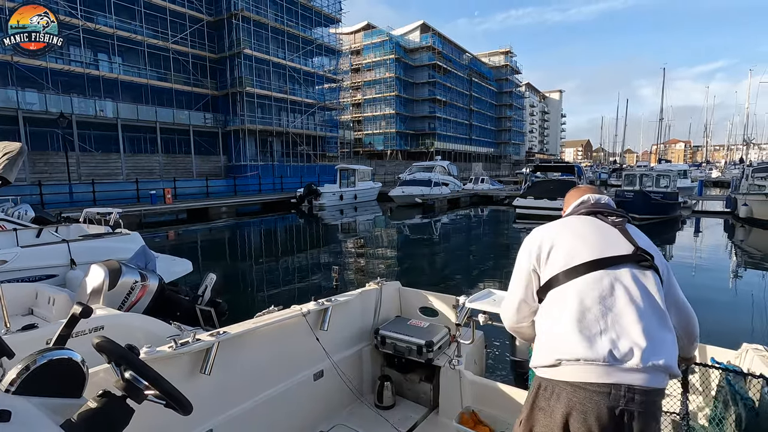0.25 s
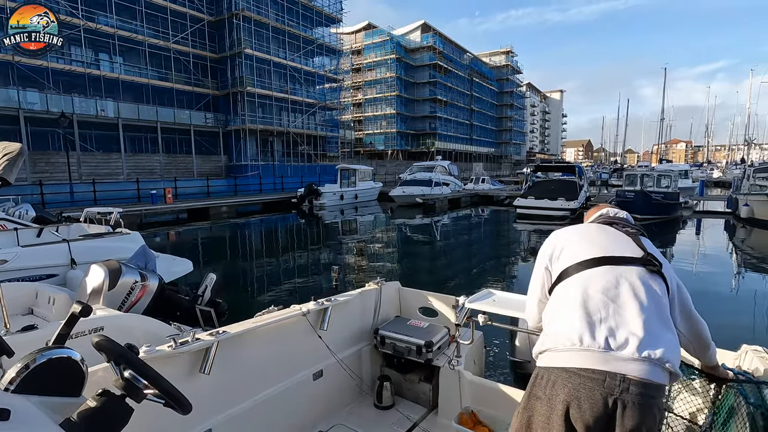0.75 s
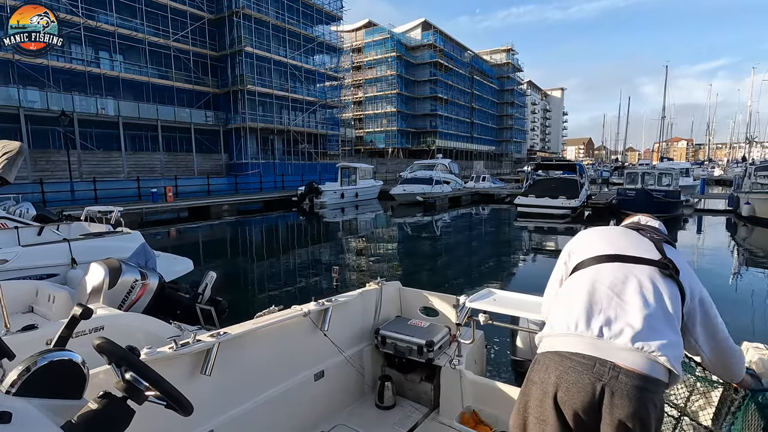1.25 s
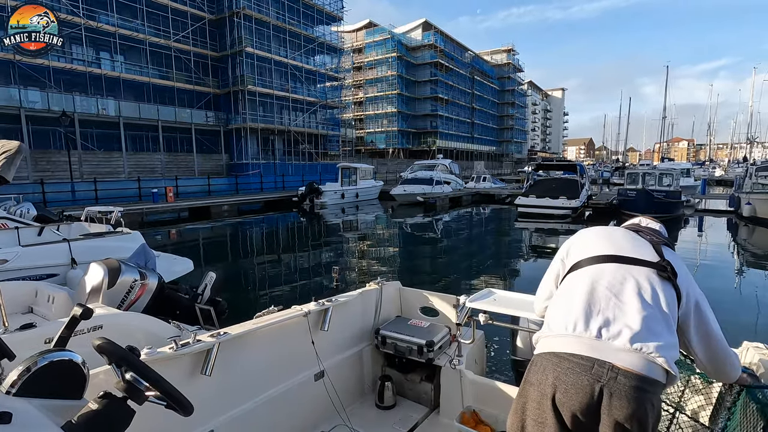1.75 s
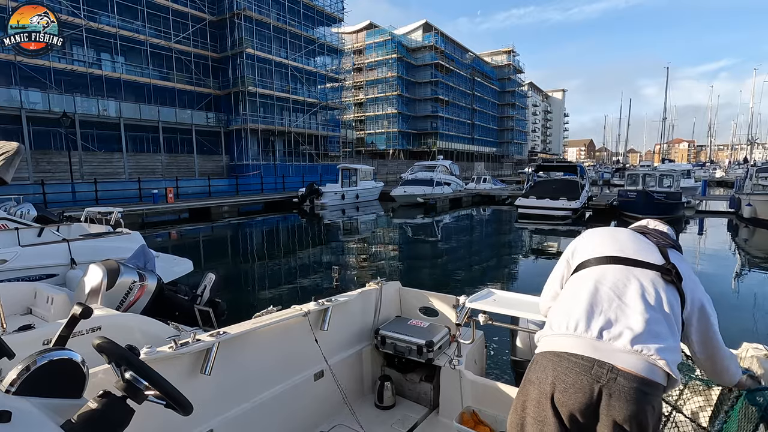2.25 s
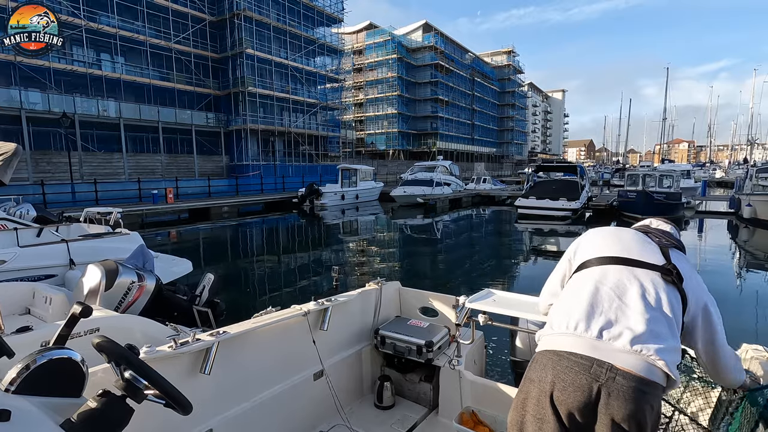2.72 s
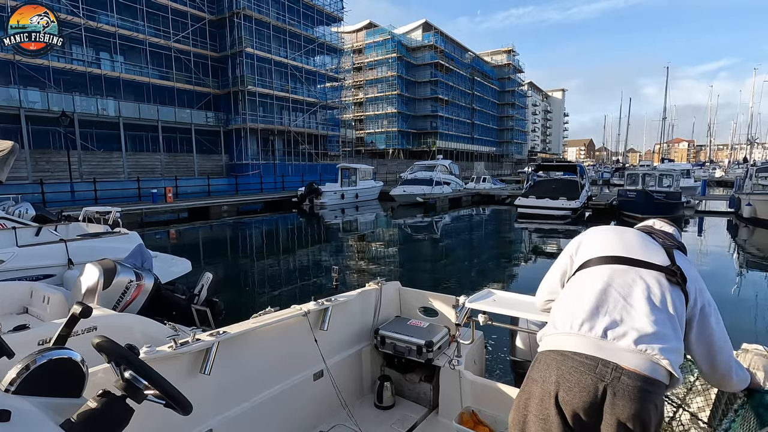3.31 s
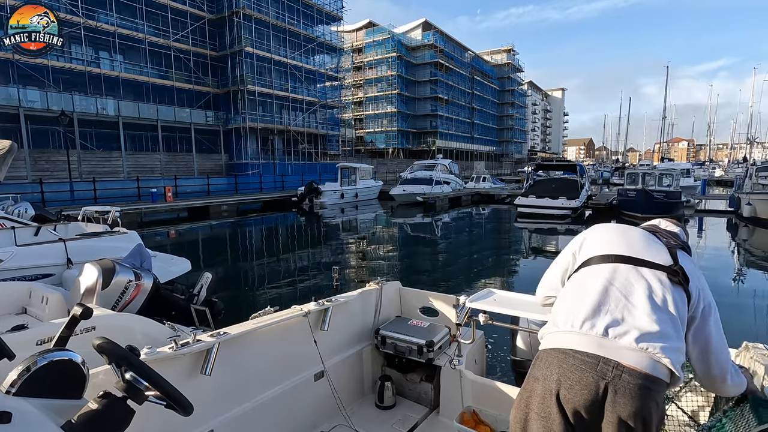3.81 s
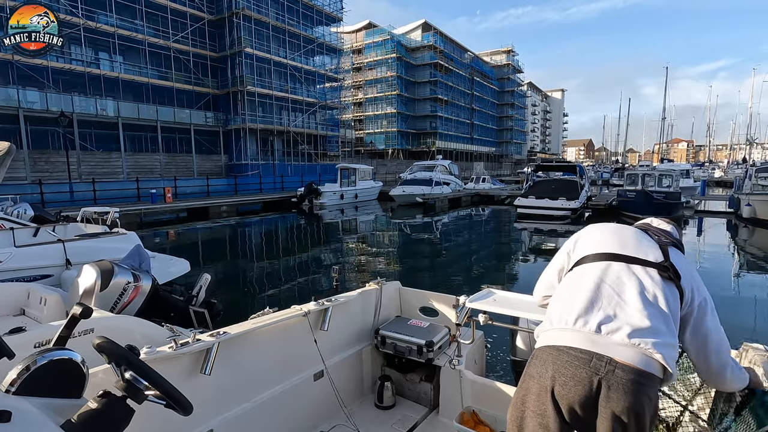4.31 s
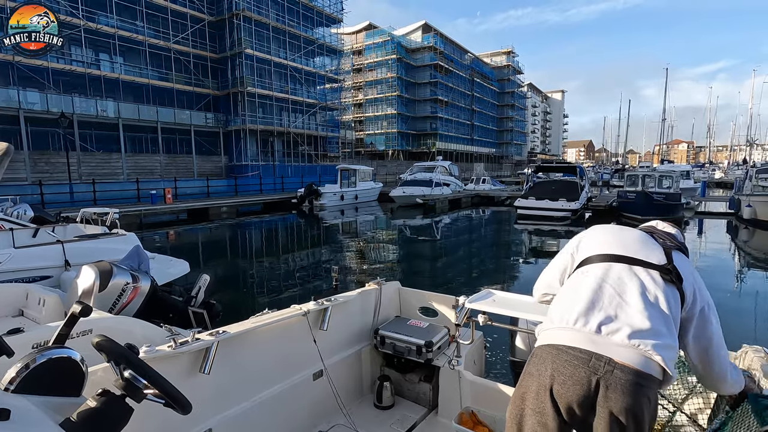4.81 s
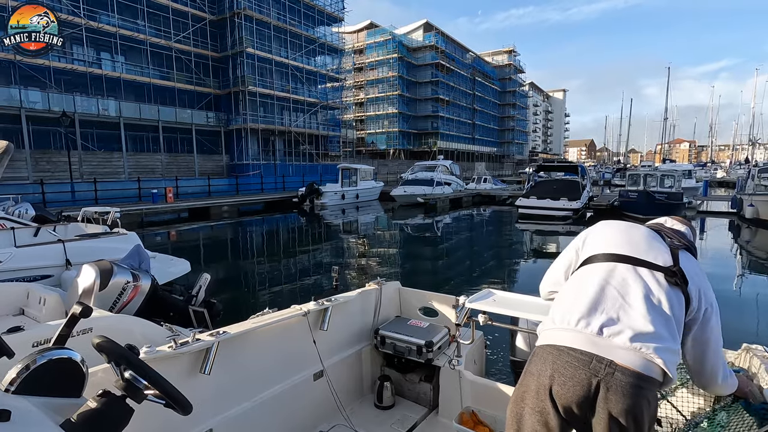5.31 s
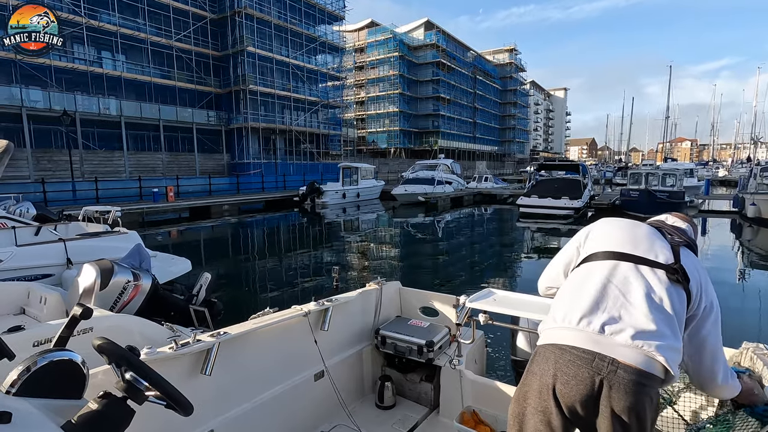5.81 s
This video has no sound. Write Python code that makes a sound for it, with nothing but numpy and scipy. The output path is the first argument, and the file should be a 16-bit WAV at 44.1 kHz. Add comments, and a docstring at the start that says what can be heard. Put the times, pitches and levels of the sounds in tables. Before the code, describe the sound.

Hollow thumps and scratchy net scuffs give way to busy wire rattling and knocking on a boat hull, close up, over a faint harbour wash.

```python
"""Hollow thuds of a small open boat come first, over the rumble and hiss of a netted wire crab trap
dragged about and knocked against its side. Blows bounce on ringing hull modes, clacks chatter through
wire modes, and scuffs and sliding net are filtered grit and noise. A dense reverb and a quiet
wash of water and town lie behind. The microphone is close; the hardest blows drive its limiter."""
import sys
import numpy as np
from scipy import signal
from scipy.fft import rfft, irfft, next_fast_len
from scipy.io import wavfile
from scipy.ndimage import uniform_filter1d, minimum_filter1d

SR = 44100
rng = np.random.default_rng(int(sys.argv[2]) if len(sys.argv) > 2 else 0)


def wav_out(sig):
    """Save sig, one row per channel (or a flat mono array), as 16-bit PCM at SR to the path in sys.argv[1]."""
    wavfile.write(sys.argv[1], SR, np.round(np.clip(np.atleast_2d(sig).T, -1, 1) * 32767).astype(np.int16))


N = 267043  # length in samples


def gain_of(db):
    """Amplitude factor of a level in dB."""
    return 10 ** (np.asarray(db) / 20)


def evened(x):
    """Scales x to an RMS of 1."""
    return x / np.sqrt(np.mean(x ** 2) + 1e-20)


def peaked(x):
    """Scales x to a peak of 1."""
    return x / (abs(x).max() + 1e-20)


def read(points, hz):
    """Reads a curve of (Hz, value) points along a logarithmic frequency axis."""
    f, value = np.transpose(points)
    return np.interp(np.log(hz + 1), np.log(f + 1), value)


def add(mix, start_s, sound):
    """Lays a sound into the mix in place, cut off at the end of the mix."""
    part = mix[round(start_s * SR):][:len(sound)]
    part += sound[:len(part)]


def coloured(x, points):
    """Filters x by a spectrum in dB."""
    size = next_fast_len(len(x))
    gain = gain_of(read(points, np.fft.rfftfreq(size, 1 / SR)))
    return irfft(rfft(x, size) * gain, size)[:len(x)]


def highpass(x, order, hz):
    """Removes the bass below hz."""
    return signal.sosfilt(signal.butter(order, hz, "high", fs=SR, output="sos"), x)


def uneven(count, s):
    """Smooth random curve of RMS 1 that changes over about s seconds."""
    width = round(s * SR)
    return evened(uniform_filter1d(uniform_filter1d(rng.standard_normal(count), width), width))


def patchy(x, patch_db):
    """Random patches, about 1 kHz by 20 ms, louder or softer than their neighbours."""
    z = signal.stft(x, nperseg=256)[2]
    across_pitch = uniform_filter1d(rng.standard_normal(z.shape), size=6, axis=0)
    patches = evened(uniform_filter1d(across_pitch, size=7, axis=1))
    return signal.istft(z * gain_of(patch_db * patches), nperseg=256)[1][:len(x)]


def taps(count, per_s, spread_db):
    """Random tiny contacts of either sign; a few stray far in size, by up to four times spread_db."""
    chance = rng.random(count)
    size = np.minimum(rng.exponential(1, count), 4)
    sign = rng.choice([-1., 1.], count)
    return (chance < per_s / SR) * sign * gain_of(spread_db * size)


def blow(t, lasts, rise):
    """Force of a blow: it rises, then dies away by 60 dB in lasts."""
    return (1 - np.exp(-t / max(rise, 1e-4))) ** 2 * gain_of(-60 * t / max(lasts, .004))


def bounces(t, per_s, spread_db, lasts, rise, first_db):
    """A firm first contact among random ones that swell and die away."""
    force = taps(len(t), per_s, spread_db) * blow(t, lasts, rise)
    first = np.arange(len(t)) == round(2 * rise * SR)
    return force + gain_of(first_db) * first


def softened(force, contact):
    """A contact that lasts a while (s) pushes smoothly and so excites less treble."""
    return np.convolve(force, np.hanning(3 + round(contact * SR)))[:len(force)]


def ring(modes, t, spot_hz, fall_db, shift):
    """Modes after one tap, shifted at random by the load; they lose fall_db per octave from spot_hz."""
    hz, db, t60 = np.transpose(modes)[:, :, None]
    hz = hz * np.exp(shift * rng.standard_normal(hz.shape))
    db = db - fall_db * abs(np.log2(hz / spot_hz))
    decay = gain_of(db - 60 * t / np.maximum(t60, .005))
    return (decay * np.sin(2 * np.pi * hz * t)).sum(0)


def struck(force, modes, t, spot_hz, fall_db, shift):
    """A body answers each push of the force with its ringing modes."""
    return signal.fftconvolve(force, ring(modes, t, spot_hz, fall_db, shift))[:len(t)]


def rubbed(modes, per_s, spread_db, spot_hz, fall_db, shift):
    """Small slips at many spots, each exciting one mode of the body."""
    modes = modes * 3  # three copies, each shifted by its own chance
    slips, which = taps(N, per_s, spread_db), rng.integers(0, len(modes), N)
    t = np.arange(SR // 8) / SR
    total = np.zeros(N)
    for k, mode in enumerate(modes):
        response = ring([mode], t, spot_hz, fall_db, shift)
        total += signal.oaconvolve(slips * (which == k), response)[:N]
    return evened(total)


# Colour of the far wash. Each row: frequency in Hz, relative filter gain in dB.
HARBOUR_COLOUR = [(24, -33), (40, -69), (277, 20), (568, -7), (728, 15), (1080, -3), (3390, -19),
                  (4030, -25), (15000, -81)]


def harbour():
    """Far, smooth wash of water and town: steady noise through a fixed spectrum."""
    return gain_of(-48) * evened(coloured(rng.standard_normal(N), HARBOUR_COLOUR))


# Reverb of the open boat. Each row: frequency in Hz, time to fall 60 dB in seconds.
COCKPIT_DECAY = [(100, 0.3), (300, 0.14), (1000, 0.11), (5000, 0.17)]


def cockpit(x):
    """Dense reflections in the open boat, each band dying at its own speed."""
    hz, t, z = signal.stft(rng.standard_normal(SR // 2), SR, nperseg=256)
    decay = gain_of(-60 * t / read(COCKPIT_DECAY, hz)[:, None])
    tail = signal.istft(z * decay, SR, nperseg=256)[1]
    return signal.fftconvolve(x, tail / np.linalg.norm(tail))[:N]


# Modes of the hull panel, before load shift and spot weighting.
# Each row: frequency in Hz, level in dB, time to fall 60 dB in seconds (before HELD when sliding).
HULL_MODES = [(138, -21, 0.093), (160, -1.5, 0.067), (172, -19, 0.25), (196.3, -8, 0.13), (243.5, 4, 0.14),
              (285, 3, 0.13), (324.4, 5.5, 0.12), (370.4, 3, 0.15), (398.6, 8, 0.16), (437, -10, 0.35),
              (537, -17, 0.19), (595, 1.5, 0.057), (681, 5, 0.12)]
# Knock of the frame's rim. Each row: frequency in Hz, filter gain in dB.
RIM_COLOUR = [(600, 7.5), (800, 10), (1100, 2), (1500, -5.5), (2200, -9.5), (4000, -60)]
HELD = 0.7  # factor on decay time: the loaded hull rings shorter while sliding


def sliding_hull(jolts):
    """Slips rumble the loaded hull while the rim ticks along it, both in jolts."""
    held_modes = [(hz, db, HELD * t60) for hz, db, t60 in HULL_MODES]
    slips = rubbed(held_modes, per_s=900, spread_db=3, spot_hz=280, fall_db=2.5, shift=0.069)
    hull = evened(softened(slips, contact=0.0005))
    rim = evened(coloured(taps(N, per_s=1200, spread_db=-1.5), RIM_COLOUR))
    boat = evened((hull + gain_of(-5.5) * rim) * gain_of(4.5 * jolts))
    return highpass(boat, 2, 95)


# Modes of the wire mesh, before load shift and spot weighting.
# Each row: frequency in Hz, level in dB, time to fall 60 dB in seconds (before LOOSE when sliding).
MESH_MODES = [(1450, 19, 0.0048), (1800, 1, 0.014), (2150, 7, 0.0026), (2420, 8, 0.015),
              (2640, 13.5, 0.0077), (3080, 10, 0.019), (3480, 4, 0.019), (3750, 8.5, 0.011),
              (4160, -9, 0.08), (5070, -10, 0.013)]
LOOSE = 1.5  # factor on decay time: the loose mesh rings longer while sliding


def sliding_mesh(jerks):
    """Slips set loose wires ringing, in jerks."""
    loose_modes = [(hz, db, LOOSE * t60) for hz, db, t60 in MESH_MODES]
    rattle = rubbed(loose_modes, per_s=1400, spread_db=4, spot_hz=2950, fall_db=8, shift=0.11)
    return evened(rattle * gain_of(4 * jerks))


# Colour of wet netting. Each row: frequency in Hz, filter gain in dB.
HISS_COLOUR = [(710, -2), (1200, -2), (1870, -2.5), (1950, -50), (2320, -0.5), (6440, -1.5), (10100, -13.5),
               (15200, -28), (16000, -40)]


def sliding_netting(jerks, hiss_gain):
    """Wet netting hisses: noise and tiny contacts, filtered and stirred in patches and jerks."""
    halting = 1 - 0.6 * hiss_gain / hiss_gain.max()  # a fast, loud slide runs more evenly
    fizz = 0.69 * evened(taps(N, per_s=2700, spread_db=5.0)) + rng.standard_normal(N)
    hiss = patchy(coloured(fizz, HISS_COLOUR), patch_db=2.5)
    return evened(hiss * gain_of(5.4 * halting * jerks))


# How hard the trap slides, in straight lines between rows.
# Each row: time in seconds, hull rumble in dB, mesh rattle in dB, hiss of wet netting in dB.
DRAG_LEVELS = [(0.0, -17.5, -37.5, -34.5), (0.46, -37.5, -35, -31.5), (0.62, -30.5, -37, -32.5),
               (1.03, -24.5, -47, -43), (1.499, -57, -37, -52), (1.65, -38.5, -50, -69),
               (1.89, -48, -49.5, -52), (2.1, -33, -36.5, -36), (2.145, -35, -41, -41),
               (2.165, -37, -35, -29.5), (2.45, -38, -30, -26.5), (2.72, -23, -30, -31.5),
               (2.805, -44.5, -39, -49.5), (2.86, -26, -39, -50), (3.3, -26.5, -41, -52.5),
               (3.55, -30, -37, -47), (3.91, -36, -41.5, -47.5), (4.49, -28, -33, -49),
               (4.79, -31, -39, -46.5), (5.08, -36, -41, -49.5), (5.45, -25.5, -27, -48),
               (5.74, -33.5, -35, -43), (6.05, -32, -29.5, -41.5)]


def drag():
    """Sliding makes the hull rumble, the mesh rattle and the netting hiss, all in jerks."""
    s, *levels = np.transpose(DRAG_LEVELS)
    t = np.arange(N) / SR
    rumble_gain, rattle_gain, hiss_gain = gain_of([np.interp(t, s, db) for db in levels])
    jerks, jolts = uneven(N, 0.026), uneven(N, 0.039)
    sliding = rumble_gain * sliding_hull(jolts) + rattle_gain * sliding_mesh(jerks)
    return sliding + hiss_gain * sliding_netting(jerks, hiss_gain)


# Netting scuffs over an edge. Each row: start in seconds, peak level in dB, time it dies in, in seconds.
NET_SCUFFS = [(0.0324, -22.5, 0.07), (0.091, -15, 0.093), (0.108, -17.5, 0.085), (0.2392, -5.5, 0.12),
              (0.281, -12, 0.14), (0.328, -11, 0.03), (0.382, -8.5, 0.06), (0.42, -14, 0.047),
              (0.495, -17, 0.16), (0.5188, -16.5, 0.03), (0.542, -8.5, 0.087), (0.67, -16, 0.059),
              (0.844, -17, 0.09), (0.9487, -25.5, 0.034), (1.3287, -23, 0.1), (1.539, -16, 0.02),
              (1.684, -29, 0.077), (2.085, -24, 0.026), (2.158, -16.5, 0.073), (2.34, -37, 0.014),
              (2.4134, -19, 0.28), (2.6968, -22, 0.055), (3.9766, -23.5, 0.16), (4.2377, -28, 0.14),
              (4.336, -27, 0.068), (4.467, -21, 0.16), (4.602, -28, 0.11), (4.9193, -23.5, 0.049),
              (5.2064, -15, 0.15), (5.487, -21.5, 0.051), (5.6163, -27.5, 0.27), (5.9782, -18.5, 0.084)]
# Every clack scuffs its netting a little: level at 3 kHz, rise with pitch (dB per octave), dB per clack dB.
GRIT_DB, GRIT_DB_PER_OCTAVE, HARDNESS = -10, 0.5, 1.66  # hard clacks shed more than their share
GRIT_S, GRIT_STRETCH = 0.0028, 0.54  # shortest grit in seconds, plus this share of the clack's time
# A stroke of USUAL_S seconds sings at SING_HZ, with TOP_DB at 13 kHz; longer strokes are brighter.
USUAL_S, SING_HZ, SING_POWER, TOP_DB, TOP_DB_PER_DOUBLING = 0.09, 5800, 0.06, -19, 5


def clack_grit():
    """The netting shaken by each clack, as rows like those of the scuffs."""
    rows = []
    for s, db, hz, lasts in FRAME_CLACKS:
        grit_db = HARDNESS * db + GRIT_DB + GRIT_DB_PER_OCTAVE * np.log2(hz / 3000)
        rows.append((s, grit_db, GRIT_S + GRIT_STRETCH * lasts))
    return rows


def scuffs():
    """Gritty strokes of treble that swell, hold, then stop; a bright band shows where strands sing."""
    out, t = np.zeros(N), np.arange(SR // 3) / SR
    for s, db, lasts in NET_SCUFFS + clack_grit():
        hz = SING_HZ * (lasts / USUAL_S) ** SING_POWER
        top_db = TOP_DB + TOP_DB_PER_DOUBLING * np.log2(lasts / USUAL_S)
        band = [(2500, -28), (hz * 0.61, -10), (hz, 0), (hz * 1.27, -10),
                (13000, top_db), (16000, top_db - 19)]  # (Hz, dB)
        grit = 0.5 * evened(taps(len(t), per_s=2200, spread_db=-4.0)) + rng.standard_normal(len(t))
        swell = 1 - np.exp(-t / (0.038 * lasts))
        stroke = swell * gain_of(-60 * (t / lasts) ** 2.5 + 3.5 * uneven(len(t), 0.0013))
        add(out, s, gain_of(db) * peaked(patchy(coloured(grit, band), patch_db=5.0) * stroke))
    return out


# The wire frame clacks and grates. Each row: start in seconds, peak level in dB,
# pitch of the struck wires in Hz, time it keeps rattling in seconds.
FRAME_CLACKS = [(0.1123, -9.5, 3320, 0.076), (0.125, -18, 3500, 0.027), (0.242, -10, 1270, .07),
                (0.384, -16.5, 2700, 0.054), (0.6803, -12, 2700, 0.018), (0.7513, -19.5, 2520, 0.057),
                (0.843, -12, 5600, 0.14), (0.8789, -11, 1510, 0.062), (0.968, -11.5, 3900, 0.017),
                (1.01, -15.5, 1130, 0.03), (1.082, -37, 980, .04), (1.233, -7.5, 2100, 0.039),
                (1.278, -2.5, 3020, 0.034), (1.332, -11, 3060, 0.047), (1.422, -5.5, 2410, 0.068),
                (1.447, -10.5, 2150, 0.026), (1.542, 0.5, 3080, 0.045), (1.5693, -6, 1530, 0.05),
                (1.6805, -15.5, 3480, 0.072), (2.011, -21, 3120, 0.057), (2.073, -19.5, 3270, 0.036),
                (2.12, -18, 3100, 0.026), (2.1613, -17, 3070, 0.12), (2.361, -17.5, 1450, 0.045),
                (2.4118, -20.5, 2330, 0.058), (2.4915, -16, 3550, 0.095), (2.695, -4, 1820, 0.059),
                (2.7617, -12.5, 2060, 0.05), (2.827, -5.5, 2980, 0.046), (2.901, -20.5, 1400, 0.046),
                (2.9975, -6.5, 3580, 0.045), (3.064, -16, 1390, 0.065), (3.0788, -3, 3300, 0.044),
                (3.1312, -5.5, 1420, 0.055), (3.2074, -23, 2190, 0.11), (3.306, -11.5, 3520, 0.054),
                (3.356, -19, 3030, 0.029), (3.413, -12, 1470, 0.039), (3.478, -15, 2240, 0.068),
                (3.5748, -8, 3020, 0.044), (3.586, -4, 2500, 0.076), (3.61, -6.5, 1990, 0.044),
                (3.7213, -8, 1660, 0.064), (3.989, -16, 3290, 0.11), (4.0605, -12.5, 2890, 0.05),
                (4.074, -17, 2230, 0.15), (4.106, -10.5, 3080, 0.09), (4.1604, -3.5, 1410, 0.031),
                (4.297, -19, 1700, .05), (4.309, -18, 1420, 0.1), (4.3277, -5, 2280, 0.09),
                (4.36, -7, 3090, 0.036), (4.367, -6.5, 1940, 0.028), (4.41, -15, 1580, 0.045),
                (4.479, -10, 3170, 0.15), (4.517, -6, 2930, 0.048), (4.5983, -14.5, 3450, 0.038),
                (4.6135, -7, 2260, 0.15), (4.6561, -3.5, 2240, 0.088), (4.9101, -14.5, 2950, 0.055),
                (4.9497, -11.5, 1590, 0.032), (5.166, -13, 3570, 0.032), (5.1826, -11, 3300, 0.036),
                (5.221, -7, 2150, 0.12), (5.27, -13.5, 2640, 0.12), (5.3384, -12.5, 3520, 0.056),
                (5.3975, -19, 2960, 0.11), (5.4341, -24, 2220, 0.087), (5.4942, -10, 1450, 0.029),
                (5.5173, -9, 3540, 0.036), (5.5584, -4.5, 2260, 0.03), (5.613, -10, 3080, 0.05),
                (5.6388, -7, 2970, 0.049), (5.67, -17.5, 3080, 0.1), (5.755, -19, 2460, 0.032),
                (5.787, -11.5, 3700, 0.035), (5.804, -11.5, 3290, 0.072), (5.823, -20, 3200, 0.062),
                (5.842, -17, 2420, 0.086), (5.869, -18.5, 2870, 0.07), (5.897, -9, 3640, .03),
                (5.9, -7.5, 2560, 0.04), (5.9778, -7, 3420, 0.069), (6.014, -25, 2710, 0.06)]
SWELL_PER_S = 0.66  # rise time over the square of the rattling time: long rattles swell slowly
REACH, REACH_SHRINK = 2.4, .35  # a 0 dB clack wakes wires to REACH times its pitch; soft ones stay narrow
WIRE_SPOT_DB, WIRE_SPOT_TURNS = 8, 36  # own ring of the struck wires: level, cycles to -60 dB


def clacks():
    """Wires chatter against each other for a moment; mainly wires near the struck spot are heard."""
    out, t = np.zeros(N), np.arange(SR // 4) / SR
    for s, db, hz, lasts in FRAME_CLACKS:
        chatter = bounces(t, per_s=3500, spread_db=3.0, lasts=lasts,
                          rise=SWELL_PER_S * lasts ** 2, first_db=2.5)
        force = softened(chatter, contact=.00012)
        modes = MESH_MODES + [(hz, WIRE_SPOT_DB, WIRE_SPOT_TURNS / hz)]
        wires = struck(force, modes, t, hz, fall_db=30, shift=.025)
        reach = max(REACH * gain_of(REACH_SHRINK * db), 1.25)
        near_spot = signal.butter(3, [0.7 * hz, reach * hz], "band", fs=SR, output="sos")
        add(out, s, gain_of(db) * peaked(signal.sosfilt(near_spot, wires)))
    return out


# The trap strikes the hull. Each row: start in seconds, level in dB (peak of the body before deck boom,
# rim knock and bass cut), pitch of the struck spot in Hz, time the blow keeps bouncing in seconds.
HULL_THUDS = [(0.007, -6, 362, 0.13), (0.127, -7.5, 218, 0.056), (0.173, -6.5, 380, 0.19),
              (0.239, -1.5, 378, 0.063), (0.35, -19, 250, .08), (0.407, -12.5, 238, 0.12),
              (0.437, -7, 262, 0.1), (0.468, -12, 248, 0.082), (0.696, -2.5, 350, 0.093),
              (0.809, -10, 283, 0.26), (0.874, -2.5, 367, 0.074), (0.917, -10.5, 164, 0.078),
              (1.008, 5, 423, 0.063), (1.055, -3, 420, 0.038), (1.078, 0.5, 400, 0.15),
              (1.111, -26, 407, .15), (1.235, -25, 825, 0.027), (1.275, -3, 694, 0.051),
              (1.327, -4, 710, 0.052), (1.379, 1, 200, 0.036), (1.407, -23, 230, 0.015),
              (1.421, -1.5, 300, 0.075), (1.446, -7, 258, 0.036), (1.541, 1, 225, 0.033),
              (1.57, 3, 250, 0.061), (1.689, -7.5, 545, 0.084), (1.907, -24, 215, 0.12),
              (2.102, -18, 278, 0.079), (2.15, -13.5, 460, 0.11), (2.325, -16, 413, 0.11),
              (2.386, -6.5, 290, 0.16), (2.629, 4, 350, 0.11), (2.642, -3.5, 156, 0.058),
              (2.697, 5, 314, 0.046), (2.801, -51, 131, 0.014), (2.827, 4.5, 375, 0.067),
              (2.902, -0.5, 150, 0.051), (2.954, -23, 136, 0.032), (3.001, -4, 346, 0.037),
              (3.038, -8, 308, 0.081), (3.069, 2.5, 436, 0.17), (3.133, 3.5, 257, 0.078),
              (3.173, -4, 156, 0.031), (3.286, -15, 303, 0.049), (3.41, 0, 163, 0.06),
              (3.588, -6.5, 620, 0.11), (3.611, -2, 432, 0.12), (3.646, 4, 295, 0.13),
              (3.72, -3.5, 430, 0.07), (3.831, -7, 418, 0.063), (3.92, -13, 147, 0.097),
              (4.158, 6.5, 243, 0.058), (4.197, -1.5, 219, 0.099), (4.255, -11.5, 168, 0.046),
              (4.315, -36, 400, 0.046), (4.33, -3.5, 329, 0.12), (4.407, -1, 150, 0.065),
              (4.491, -2.5, 368, 0.17), (4.526, 0, 214, 0.036), (4.6, -32, 870, 0.018),
              (4.619, -1, 440, 0.068), (4.638, -7, 330, 0.055), (4.665, -1.5, 383, 0.067),
              (4.952, 7, 205, 0.082), (5.125, -15.5, 310, 0.05), (5.228, -5.5, 310, 0.047),
              (5.278, -8.5, 350, 0.078), (5.464, -10, 300, 0.045), (5.491, -1, 303, 0.071),
              (5.562, 1, 300, 0.021), (5.665, -6, 374, 0.03), (5.748, -0.5, 368, 0.097),
              (5.792, -28, 292, 0.014), (5.83, -3, 284, 0.035), (5.855, -22, 603, 0.071),
              (5.888, -3.5, 228, 0.016), (5.906, -5.5, 250, 0.03), (5.965, -16, 354, 0.016)]
ON_DECK_S, DECK_DB, DECK_HZ = 1.2, -12, 136  # until ON_DECK_S the trap bumps the deck: a low boom joins
CONTACT_S, CONTACT_HZ = 0.00072, 350  # contact time at that pitch; low spots yield and hold it longer
SPOT_DB, SPOT_TURNS = 6, 14  # own ring of the struck spot: level, cycles to -60 dB
# The rim knocks hard only where bare wire clacks with the thud.
PADDED_RIM_DB, BARE_RIM_DB = -20, -0.5  # softest knock; knock when clack and thud are level
WIRE_SHARE, APART_DB_PER_S = 0.81, 425  # knock dB per clack dB; clack dB lost per second apart


def thuds():
    """Each blow bounces a few times on the hull panel; a hard rim adds a short knock."""
    out, t = np.zeros(N), np.arange(SR // 3) / SR
    clack_s, clack_db = np.transpose(FRAME_CLACKS)[:2]
    for s, db, hz, lasts in HULL_THUDS:
        pushes = bounces(t, per_s=600, spread_db=2.5, lasts=lasts, rise=0.0303 * lasts, first_db=7)
        force = softened(pushes, contact=CONTACT_S * CONTACT_HZ / hz)
        modes = HULL_MODES + [(hz, SPOT_DB, SPOT_TURNS / hz)]
        body = peaked(struck(force, modes, t, hz, fall_db=18, shift=0.042))
        if s < ON_DECK_S:
            boom = struck(force, HULL_MODES[:3], t, DECK_HZ, fall_db=15, shift=0.048)
            body = body + gain_of(DECK_DB) * peaked(boom)
        wire_db = (clack_db - APART_DB_PER_S * abs(clack_s - s)).max()
        rim_db = max(PADDED_RIM_DB, BARE_RIM_DB + WIRE_SHARE * (wire_db - db))
        knock = coloured(rng.standard_normal(len(t)), RIM_COLOUR) * blow(t, 2.06 * lasts, rise=0.00054)
        add(out, s, gain_of(db) * (body + gain_of(rim_db) * peaked(knock)))
    return highpass(out, 4, 115)  # a thin panel radiates no deep bass


def scene():
    """Blows and scuffs with their reflections, over the sliding trap and the far wash."""
    hits = thuds() + clacks() + scuffs()
    return (hits + gain_of(-10.0) * cockpit(hits) + drag() + harbour())[None]


def record(dry):
    """Bass cut of the microphone, a limiter that holds peaks near full scale, band limit."""
    thin = highpass(dry, 3, 70)
    allowed = minimum_filter1d(1 / np.maximum(abs(thin), 1), size=141)
    limited = thin * uniform_filter1d(allowed, size=91)
    band_limit = signal.firwin(511, 16200, window=("kaiser", 9), fs=SR)  # low-pass, Hz
    return signal.oaconvolve(limited, band_limit[None], "same")


dry = scene()
out = record(dry)
wav_out(out)
```